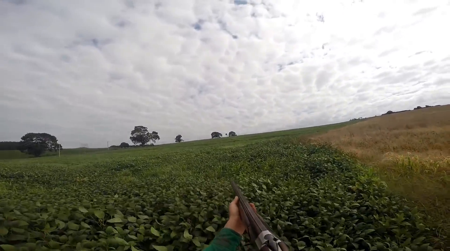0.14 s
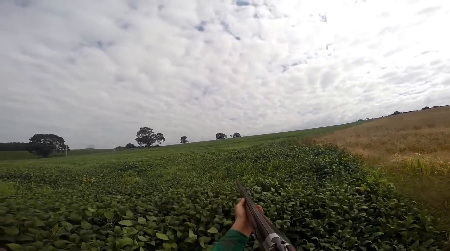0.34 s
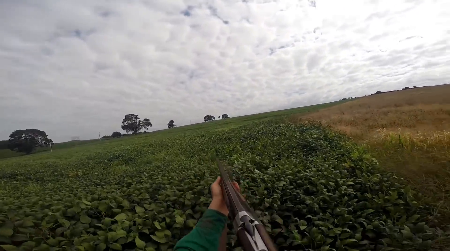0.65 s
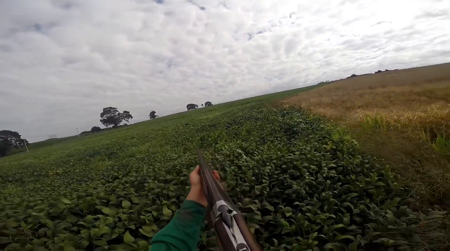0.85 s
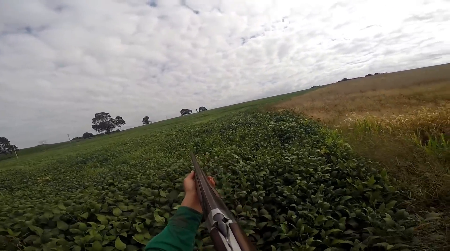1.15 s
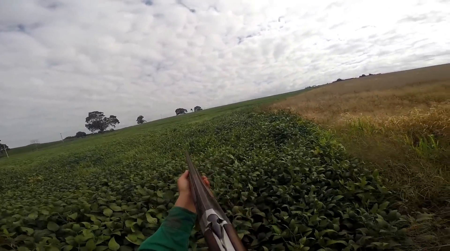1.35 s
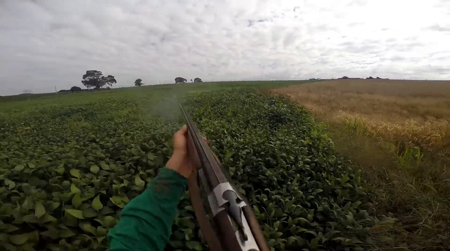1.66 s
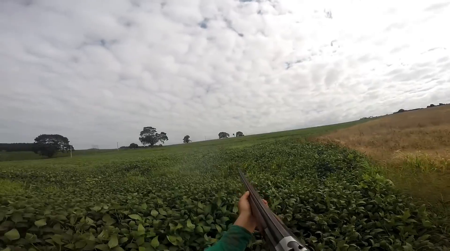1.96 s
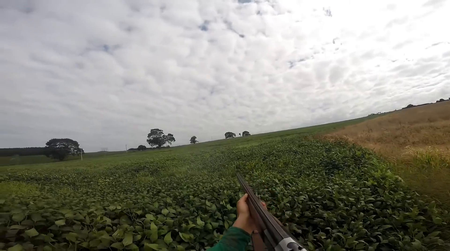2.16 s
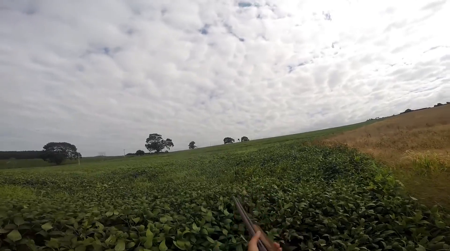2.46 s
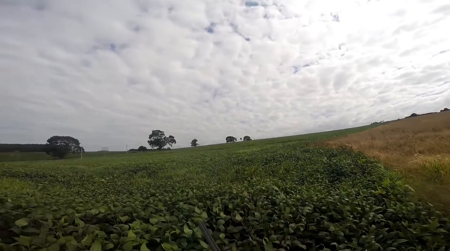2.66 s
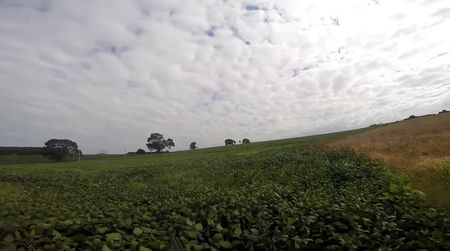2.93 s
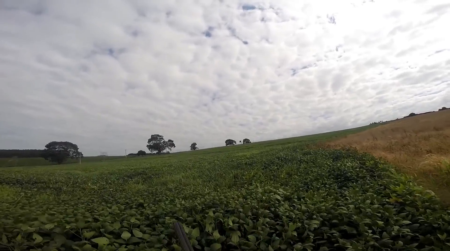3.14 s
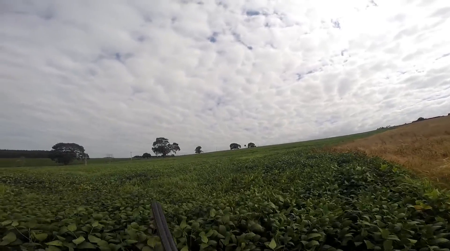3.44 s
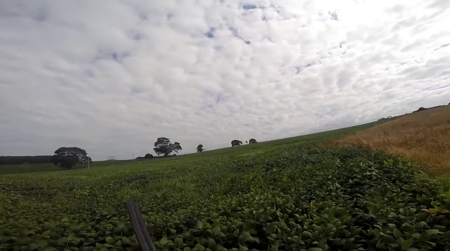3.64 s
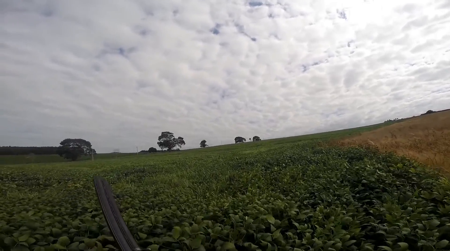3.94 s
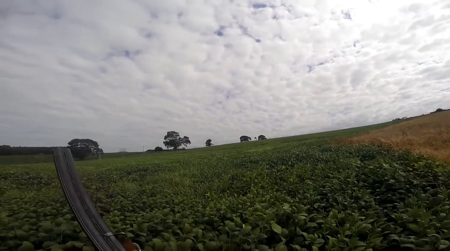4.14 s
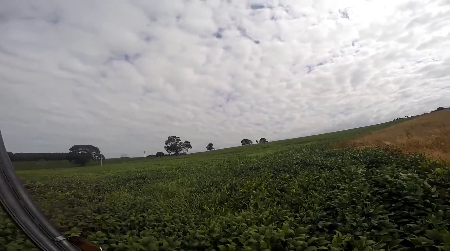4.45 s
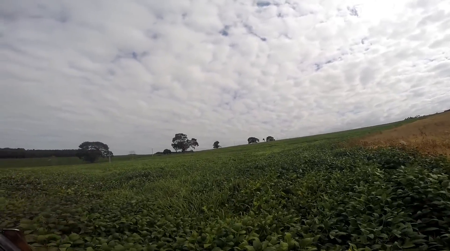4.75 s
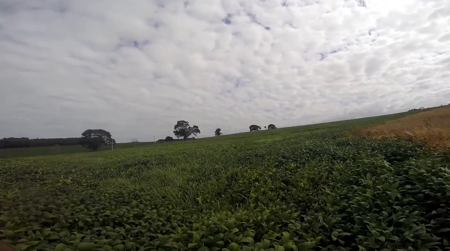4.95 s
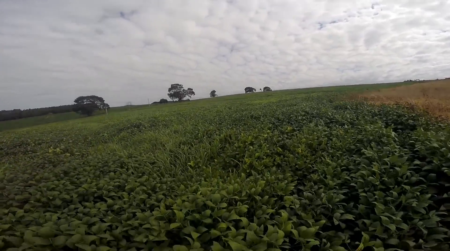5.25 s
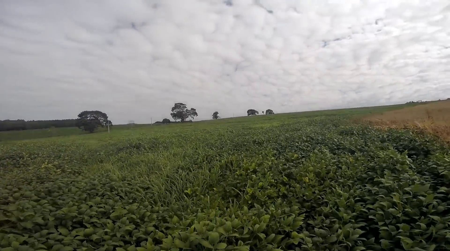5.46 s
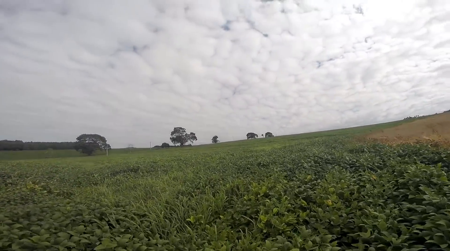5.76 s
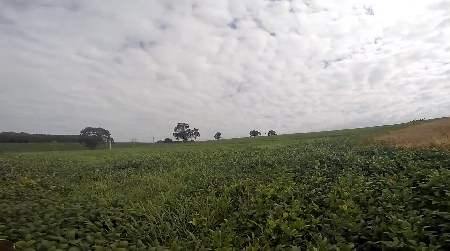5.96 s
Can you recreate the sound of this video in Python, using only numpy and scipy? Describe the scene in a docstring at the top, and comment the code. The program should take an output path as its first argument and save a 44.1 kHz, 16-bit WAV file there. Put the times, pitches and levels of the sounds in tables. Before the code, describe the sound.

Wind dominates from the start: low, uneven pressure lumps and fluttering thumps around 200 to 300 Hz on a small camera's housed microphone, with thin hiss and high whine beneath. A tiny far chirp comes at 0.8 s. Strong puffs and a thin snap at 1.45 s precede one close shotgun shot at 1.63 s: a clipped low push, tight double crack, and a dry, bright report rolling off the field, mostly gone by 2 s. Hiss drops, then slowly recovers. Small metal ticks and stem snaps follow at 2.3-2.8 s. Gusts crowd into raspy flutter with fine snaps around 2.9-3.3 s, then ease. A knocking gear clatter lands at 4.21 s, stems snap near 4.6 s amid hard puffs, and another quick metal clatter comes at 5.25-5.3 s. Soft, crackling leaf swishes from passing legs recur from 4 s to the end, with a heavy wind thump at 5.8 s.

```python
"""A shotgun is fired once over an open crop field: a low overloading push, a double crack, a roll from the field.
Gusty wind thumps on the microphone port of a small camera in its housing: shaped noise and single bell-shaped tones.
Legs swish through leaves (swelling noise and crackle), gun and gear tick (decaying modes), short noise bursts rasp.
A far bird chirps once; the camera's own hiss and whine sink after loud moments, then recover."""
import sys
import numpy as np
from scipy import signal
from scipy.fft import rfft, irfft, next_fast_len
from scipy.io import wavfile
from scipy.ndimage import uniform_filter1d, map_coordinates

SR = 44100
rng = np.random.default_rng(int(sys.argv[2]) if len(sys.argv) > 2 else 0)


def generate_wav(sig):
    """Save sig (samples, or channels by samples) to the path in sys.argv[1] as 16-bit PCM at SR."""
    pcm = np.round(np.clip(np.atleast_2d(sig).T, -1, 1) * 32767).astype(np.int16)
    wavfile.write(sys.argv[1], SR, pcm)


N = 268877

# Noise colours. Each row: frequency in Hz, relative level in dB per Hz.
HISS_COLOUR = [(400, -19), (800, -1), (1400, -3), (4700, -13), (5800, -12.5), (8000, -19), (12000, -22.5),
               (14800, -28), (15600, -31.5)]
# Leaves, heard through the housing, which favours two bands. Columns as above.
LEAF_COLOUR = [(550, -31), (900, -5), (1400, -2.5), (2600, 0.5), (3000, 0), (3400, 1.5), (3900, -5),
               (5200, -10), (5900, -3), (6700, -10), (7900, -21.5), (11000, -19.5), (14300, -50.5)]
# Dull part of the rough bursts. Columns as above.
ROUGH_COLOUR = [(300, -33), (600, 15.5), (1000, 4), (2500, -6), (4000, -29), (9000, -43)]
# Crack of small contacts and snaps. Columns as above.
CONTACT_COLOUR = [(250, -26.5), (600, -2.5), (1200, 4), (2500, 2), (3500, -11.5), (6000, -15), (10000, -27),
                  (15000, -34.5)]
# Slow wind pressure. Columns as above.
RUMBLE_COLOUR = [(12, -28), (22, -1), (60, 4.5), (120, -0.5), (200, -8.5), (330, -34), (600, -90.5)]
# Small wind eddies. Columns as above.
FLUTTER_COLOUR = [(40, -28), (110, 0.5), (200, -1), (290, 4), (340, -3), (400, -9.5), (470, -16),
                  (560, -28), (750, -40.5), (1000, -87)]
# Rasp of strong eddies. Columns as above.
RASP_COLOUR = [(300, -27.5), (500, 17.5), (700, 2), (900, -12.5), (1500, -23), (2500, -35), (5000, -45.5),
               (12000, -63.5)]
# The muzzle crack itself. Columns as above.
MUZZLE_COLOUR = [(400, -24), (700, -5), (1050, 4), (1300, -6), (2100, -5), (3300, -1), (4800, -13),
                 (8400, -21), (15500, -39)]
# The report through the housing. Columns as above.
REPORT_COLOUR = [(470, -45.5), (800, -23.5), (1700, -5.5), (2210, -8.5), (2750, -5), (3050, -7.5),
                 (3400, -1), (3860, -8.5), (5070, -11.5), (5600, -9), (6700, -14.5), (7600, -24),
                 (11500, -29.5), (15500, -43.5)]

# Camera electronics. Each row: frequency in Hz, relative level in dB.
WHINE_LINES = [(5846, 6), (8780, -7.5), (11715, 1.5), (14626, 1)]
# Drops of hiss, whine and the faint rustle of leaves after loud moments.
# Each row: start in seconds, depth in dB.
SINKS = [(1.449, 7), (1.629, 14), (2.299, 7.5), (2.97, 11.5), (3.13, 11), (4.68, 7.5), (5.801, 4.5)]
# A far bird. Each row: centre in seconds, level in dB, pitch in Hz, half length in ms.
BIRD_CHIRPS = [(.81, -56, 1210, 30)]
# Legs push through the leaves. Each row: centre in seconds, level in dB, half length in ms.
SWISHES = [(2.5, -70, 75), (3.97, -65.5, 100), (4.489, -63, 70), (4.615, -62, 40), (4.85, -65, 270),
           (5.43, -59, 100), (5.719, -65.5, 170), (6.07, -59.5, 100)]
# Single stems snap. Each row: centre in seconds, level in dB, ring in Hz.
STEM_SNAPS = [(2.482, -50, 1450), (2.506, -49, 1450), (2.555, -52.5, 3400), (4.548, -49, 2800),
              (4.592, -51, 2700), (4.637, -45, 2930), (4.649, -44, 2580), (4.753, -50, 2750),
              (4.812, -51, 3400)]
# Short rough bursts of noise: brushes, gust rasp and the crunch of knocks. Each row: peak time in seconds,
# level in dB, rise in ms, fall in ms, bright crunch over the dull noise in dB.
ROUGH_BURSTS = [(2.26, -51, 25, 25, -21.5), (3.145, -45.5, 87, 3.3, -13), (3.272, -48.5, 2, 9.6, -16),
                (4.215, -46, 0.7, 23, -6.5), (5.288, -45, 2.8, 24, 2)]
# Gun and gear contacts. Each row: start in seconds, level in dB, ring in Hz, then crack, knock and
# bright modes, each in dB relative to the ring.
CONTACTS = [(1.794, -45, 1500, 5, 6, -25.5), (2.3349, -43, 3440, 0, -19, -15),
            (2.417, -43.5, 2430, -14, -15, -20), (2.602, -44, 2360, -5, -11, -18),
            (2.8175, -36, 2270, -9, -1, -7), (4.214, -33, 2400, -1.5, 11, -12),
            (4.2225, -40, 2420, -6, 21, -19), (4.2294, -42, 2360, -2.5, 17, -17),
            (4.245, -46.5, 2280, 1, 4, -13), (5.245, -43, 2400, -6, -10, -22),
            (5.286, -41.5, 2710, -4, 23, -9), (5.29, -36, 2350, -8, -8, -17),
            (5.297, -34, 2300, -2, -15, -18), (5.303, -34.5, 1860, -10, -17, -16)]
# Upper modes of the steel. Each row: frequency in Hz, relative level in dB, 60 dB decay in seconds.
STEEL_MODES = [(4500, -2.5, 0.013), (5060, -2, 0.0095), (5560, -8, 0.018), (9400, -10, .012)]
# Thin bright snaps in the strongest gusts. Each row: start in seconds, level in dB.
GUST_SNAPS = [(1.4492, -31), (3.1057, -38), (3.118, -36), (3.135, -42)]
# Gusts. Each row: start in seconds, length in seconds, rumble level in dB, flutter level in dB.
GUSTS = [(0.0, 0.48, -22, -34.5), (0.496, 0.21, -16.5, -22), (0.763, 0.14, -18.5, -29.5),
         (0.941, 0.081, -17, -28), (1.032, 0.21, -28, -40.5), (1.215, 0.26, -18.5, -25),
         (1.41, .2, -19.5, -19), (1.645, 0.16, -40, -38), (1.841, 0.033, -45, -26),
         (1.92, 0.23, -35.5, -33), (2.187, 0.0034, -30.5, -20.5), (2.225, 0.24, -22, -18.5),
         (2.527, 0.0042, -35, -21), (2.582, 0.16, -19, -23.5), (2.759, 0.064, -26, -32),
         (2.846, 0.073, -16, -21), (2.958, 0.03, -30, -19), (3.012, 0.087, -37.5, -17.5),
         (3.072, 0.053, -25, -12), (3.16, 0.051, -39, -20), (3.264, 0.035, -32.5, -16.5),
         (3.325, 0.064, -37.5, -21), (3.432, 0.072, -41, -32), (3.572, 0.029, -26.5, -43.5),
         (3.676, 0.13, -24, -23.5), (3.852, 0.063, -35, -36.5), (3.933, 0.033, -17, -26.5),
         (4.022, 0.015, -18, -15), (4.112, 0.16, -22.5, -23), (4.457, 0.031, -18.5, -26),
         (4.522, 0.081, -30.5, -37), (4.637, 0.12, -24.5, -18), (4.805, 0.26, -20.5, -24),
         (5.129, 0.099, -16.5, -29), (5.28, 0.18, -24.5, -28.5), (5.477, 0.085, -30, -35),
         (5.656, 0.21, -19, -22.5), (5.926, 0.032, -20.5, -29.5), (6.014, .1, -22.5, -26.5)]
# Strongest eddies ringing the port. Each row: centre in seconds, level in dB, pitch in Hz, rasp in dB.
PUFFS = [(0.069, -10, 208, -57), (0.361, -16, 257, -47), (0.501, -11.5, 186, -56), (0.54, -9.5, 217, -43),
         (0.577, -9.5, 160, -61), (0.598, -4.5, 199, -42.5), (0.642, -12, 168, -46),
         (0.957, -9.5, 226, -38.5), (0.984, -9, 214, -47), (1.368, -7.5, 190, -50), (1.451, -4, 294, -19.5),
         (1.513, -3, 230, -29.5), (1.584, -4.5, 236, -40), (1.879, -10.5, 225, -40), (1.899, -18, 270, -55),
         (1.965, -16.5, 266, -48), (2.062, -22.5, 299, -51.5), (2.195, -5.5, 258, -36),
         (2.229, -7.5, 338, -37), (2.247, -5.5, 276, -35), (2.272, -2, 266, -34), (2.319, -9, 111, -58),
         (2.374, -8.5, 216.6, -58), (2.404, -8, 172, -55.5), (2.441, -6.5, 269, -52.5),
         (2.574, -8.5, 235, -62), (2.595, -6, 218, -56), (2.662, -6, 236, -39), (2.888, -8.5, 191, -52.5),
         (2.918, -2.5, 304, -51.5), (2.963, -2, 296, -29), (2.984, -9.5, 298, -24), (2.991, -1, 306, -27),
         (2.997, -13, 318, -23.5), (3.045, -11, 307, -27.5), (3.062, -8.5, 307, -23.5),
         (3.083, -5.5, 250, -30), (3.093, -7, 286, -30), (3.108, -3.5, 267, -29), (3.124, -5.5, 322, -33),
         (3.146, -14, 314, -27), (3.174, -14, 314, -32), (3.268, -14, 208, -47), (3.289, -12, 315, -40),
         (3.384, -14, 284, -44), (3.681, -16.5, 186, -54.5), (3.745, -9.5, 240, -54),
         (4.031, -8.5, 230, -38.5), (4.046, -1.5, 245, -26), (4.117, -12, 241, -58.5),
         (4.166, -13.5, 312, -37), (4.275, -11, 300, -56), (4.465, -14.5, 205, -50),
         (4.644, -3.5, 210, -34), (4.672, 0, 253.5, -35), (4.699, -9, 276, -62), (4.722, -4, 282, -47),
         (4.742, -4, 228, -37), (4.837, -10, 235, -53), (4.867, -11, 252, -46), (4.907, -9.5, 219, -55),
         (5.027, -11, 270, -47), (5.145, -7, 245, -45.5), (5.185, -8.5, 207, -37.5),
         (5.236, -14.5, 275, -49), (5.664, -6, 255, -47.5), (5.739, -14, 120, -62),
         (5.774, -10.5, 234, -54), (5.803, -1.5, 206.5, -31), (5.832, -6, 213, -52),
         (5.926, -10, 235, -49.5), (6.056, -10, 179, -52), (6.074, -10, 190, -53)]
# Low push of the shot and its ground bounce. Each row: delay in seconds, level in dB, pitch in Hz,
# half length in ms.
SHOT_PUSHES = [(0, 6.5, 283.5, 1.5), (.0072, -6, 246.6, 1.6)]
# The report rolls back from the field. Each row: time in seconds, level in dB, tilt in dB per octave.
FIELD_ROLL = [(1.639, -32, 2.5), (1.654, -39.5, 0.5), (1.718, -43.5, 2.5), (1.749, -49.5, -5),
              (1.78, -47, -1), (1.815, -45, -1.5), (1.869, -53.5, -3), (1.92, -56.5, -4), (1.98, -61.5, -5),
              (2.121, -72, -1.5)]
# Single echoes. Each row: centre in seconds, level in dB, half length in ms, tilt in dB per octave.
ECHOES = [(1.679, -40.5, 2, 2), (1.684, -40, 1.8, 4), (1.706, -41, 0.91, 6.5)]

WHINE_DB, HISS_DB, BREEZE_DB = -77.5, -60.5, -68.5  # before any sinking
RECOVER_DB_PER_S, SINK_S = 8, 0.03
CRACKLES_PER_S, CRACKLE_DB = 64, -8  # level relative to the rustle
STEM_HALF_MS = 1.3
RING_T60_S, CRACK_T60_S = 0.018, 0.012
KNOCK_HZ, KNOCK_T60_S = 780, 0.007
LULL_RUMBLE_DB, LULL_FLUTTER_DB = -42, -43  # between gusts
GUST_RISE_MS, GUST_FALL_MS = 3.9, 12.9
RUMBLE_SLOWER = 1.5  # factor on rise and fall
PUFF_HALF_MS_AT_250_HZ, PUFF_PITCH_POWER, RASP_LONGER = 2.3, 0.65, 1.44
PUSH_PER_OCTAVE, PUSHLESS_HZ = 0.86, 266  # lower puffs ride on a larger one-sided push
PHASE_SPREAD_CYCLES = 0.22  # scatter about suction at the puff's centre
FLUTTER_DISPLACED = 0.35  # share of the flutter that a puff replaces
SHOT_S = 1.632
TOP_HZ = 15650


def amp(db):
    """dB to amplitude."""
    return 10 ** (np.asarray(db) / 20)


def unit(x):
    """x scaled to rms 1."""
    return x / np.sqrt(np.mean(x ** 2) + 1e-20)


def bell(t, half_ms):
    """Gaussian envelope with half_ms as its standard deviation."""
    return np.exp(-0.5 * (t / (half_ms / 1000)) ** 2)


def along(points, hz):
    """(Hz, value) points interpolated on a log axis."""
    f, v = np.transpose(points)
    return np.interp(np.log(hz + 1), np.log(f + 1), v)


def wobble(rate):
    """Smooth random curve, rate knots a second."""
    knots = rng.standard_normal(int(N * rate / SR) + 4)
    return map_coordinates(knots, [np.arange(N) * rate / SR])


def filtered(x, response):
    """x times a response of frequency."""
    m = next_fast_len(len(x) + 8192)
    return irfft(rfft(x, m) * response(np.fft.rfftfreq(m, 1 / SR)), m)[:len(x)]


def coloured(x, spectrum):
    """x given a (Hz, dB) colour, rms 1."""
    return unit(filtered(x, lambda hz: amp(along(spectrum, hz))))


def lumpy(rate, depth_db):
    """White noise whose level wanders at rate knots a second."""
    return amp(depth_db * wobble(rate)) * rng.standard_normal(N)


def evened(x, span_s):
    """x with its level held steady over span_s; faster lumps stay."""
    span = round(span_s * SR)
    power = uniform_filter1d(uniform_filter1d(x ** 2, span), span)
    return x / np.sqrt(np.abs(power) + 0.0016)


def wavelets(rows, push):
    """Bell-shaped tone for each (s, dB, Hz, half ms) row, riding on a one-sided push of that share."""
    out, t = np.zeros(N + SR), np.arange(-SR // 10, SR // 10) / SR
    turns = 0.5 + PHASE_SPREAD_CYCLES * rng.standard_normal(len(rows))
    for (s, db, hz, half_ms), share, turn in zip(rows, push, turns):
        tone = np.cos(2 * np.pi * (hz * t + turn)) + share * np.cos(2 * np.pi * turn)
        out[round(s * SR):][:len(t)] += amp(db) * bell(t, half_ms) * tone
    return out[SR // 10:][:N]


def sinking():
    """Gain of hiss, whine and faint rustle: a quick drop at each loud moment, then a steady climb in dB."""
    t = np.arange(N) / SR
    drops_db = [np.where(t > s, db - RECOVER_DB_PER_S * (t - s), 0) for s, db in SINKS]
    depth_db = np.maximum(np.max(drops_db, axis=0), 0)
    return amp(-uniform_filter1d(depth_db, round(SINK_S * SR)))


def camera_noise(sunk):
    """Coloured hiss and steady sine lines, both under the sinking gain."""
    t = np.arange(N) / SR
    whine = np.zeros(N)
    for hz, db in WHINE_LINES:
        drift = 0.035 * np.cumsum(rng.standard_normal(N))  # phase noise widens the line
        whine += amp(WHINE_DB + db) * np.sin(2 * np.pi * hz * t + drift)
    hiss = amp(HISS_DB) * coloured(rng.standard_normal(N), HISS_COLOUR)
    return sunk * (hiss + whine)


def far_bird():
    """Short bell-shaped tone without push."""
    return wavelets(BIRD_CHIRPS, push=np.zeros(len(BIRD_CHIRPS)))


def crackle():
    """Leaves and stems snap: sparse short rings of scattered size and pitch, coloured like the leaves."""
    when, size, pitch = rng.random((round(CRACKLES_PER_S * N / SR), 3)).T
    t = np.arange(-150, 150) / SR
    tones = np.cos(2 * np.pi * 1300 * 5 ** pitch[:, None] * t)
    rings = amp(-4 * np.log(size + 0.13))[:, None] * bell(t, 0.8) * tones
    spots = (when * (N - len(t))).astype(int)[:, None] + np.arange(len(t))
    return coloured(np.bincount(spots.ravel(), rings.ravel(), N), LEAF_COLOUR)


def leaves(sunk):
    """Coloured noise and crackle swell with each swish over a faint breeze; single stems ring briefly."""
    t = np.arange(N) / SR
    swishes = sum(amp(db) * bell(t - s, half_ms) for s, db, half_ms in SWISHES)
    stir = (amp(BREEZE_DB) * sunk + swishes) * amp(1.1 * wobble(30))
    rustle = coloured(lumpy(rate=990, depth_db=1.0), LEAF_COLOUR)
    stems = wavelets([(*row, STEM_HALF_MS) for row in STEM_SNAPS], push=np.zeros(len(STEM_SNAPS)))
    return stir * (rustle + amp(CRACKLE_DB) * crackle()) + stems


def rough_bursts():
    """Brushes, gust rasp and crunch of knocks: grainy dull noise and a brighter crunch under one swell each."""
    t = np.arange(N) / SR
    dull = coloured(lumpy(rate=180, depth_db=4.0), ROUGH_COLOUR)
    crunch = coloured(lumpy(rate=300, depth_db=8.0), LEAF_COLOUR)
    out = np.zeros(N)
    for s, db, rise_ms, fall_ms, crunch_db in ROUGH_BURSTS:
        swell = bell(t - s, np.where(t < s, rise_ms, fall_ms))
        out += amp(db) * swell * (dull + amp(crunch_db) * crunch)
    return out


def decaying_mode(t, hz, db, t60_s):
    """Sine falling 60 dB in t60_s."""
    return amp(db - 60 * t / t60_s) * np.sin(2 * np.pi * hz * t)


def gear_ticks():
    """Each small contact rings the steel in decaying modes, cracks and knocks the housing."""
    out, t = np.zeros(N + SR), np.arange(SR // 10) / SR
    onset = 1 - np.exp(-t / 0.00034)
    for s, db, hz, crack_db, knock_db, bright_db in CONTACTS:
        ring = decaying_mode(t, hz, 0, RING_T60_S)
        knock = decaying_mode(t, KNOCK_HZ, knock_db, KNOCK_T60_S)
        bright = sum(decaying_mode(t, f, level + bright_db + rng.normal(0, 2), t60_s)
                     for f, level, t60_s in STEEL_MODES)
        noise = coloured(rng.standard_normal(len(t)), CONTACT_COLOUR)
        crack = amp(crack_db - 60 * t / CRACK_T60_S) * noise
        out[round(s * SR):][:len(t)] += amp(db) * (ring - knock + bright + crack) * onset
    return out[:N]


def gust_snaps():
    """Each snap is a very short burst of crack noise."""
    out, t = np.zeros(N + SR), np.arange(SR // 10) / SR
    for s, db in GUST_SNAPS:
        noise = coloured(rng.standard_normal(len(t)), CONTACT_COLOUR)
        out[round(s * SR):][:len(t)] += amp(db) * bell(t - 0.001, 0.18) * noise
    return out[:N]


def gusts():
    """Rumble and flutter level in dB: each gust rises, holds and falls back to the lull."""
    t, slower = np.arange(N) / SR, np.array([[RUMBLE_SLOWER], [1]])
    power = amp([[2 * LULL_RUMBLE_DB], [2 * LULL_FLUTTER_DB]]) * np.ones(N)
    for s, length_s, *levels_db in GUSTS:
        near = slice(max(round((s - 0.2) * SR), 0), round((s + length_s + 0.4) * SR))
        before, after = np.minimum(t[near] - s, 0), np.maximum(t[near] - s - length_s, 0)
        shape = bell(before, GUST_RISE_MS * slower) * bell(after, GUST_FALL_MS * slower)
        power[:, near] += (amp(levels_db)[:, None] * shape) ** 2
    return 10 * np.log10(power)


def puff_ms(hz):
    """Half length of a puff: higher ones, nearer the port's resonance, ring longer."""
    return PUFF_HALF_MS_AT_250_HZ * (hz / 250) ** PUFF_PITCH_POWER


def puffs():
    """Strong eddies ring the port, the lower ones with a one-sided pressure push."""
    rows = [(s, db, hz, puff_ms(hz)) for s, db, hz, _ in PUFFS]
    push = [PUSH_PER_OCTAVE * max(np.log2(PUSHLESS_HZ / hz), 0) for _, _, hz, _ in PUFFS]
    return wavelets(rows, push)


def wind():
    """Slow pressure lumps, a lumpy flutter of small eddies and single strong puffs with a rasp."""
    t = np.arange(N) / SR
    rumble_db, flutter_db = gusts() + 0.91 * wobble(22)  # quick level changes shared by both layers
    rumble = amp(rumble_db) * evened(coloured(lumpy(rate=14, depth_db=7.5), RUMBLE_COLOUR), span_s=0.061)
    flutter = amp(flutter_db) * evened(coloured(lumpy(rate=46, depth_db=6.0), FLUTTER_COLOUR), span_s=0.046)
    rasp_level = amp(2.8 * flutter_db - 10.5)  # grows faster than the flutter itself
    for s, _, hz, rasp_db in PUFFS:
        near = slice(max(round((s - 0.05) * SR), 0), round((s + 0.05) * SR))
        shape = bell(t[near] - s, RASP_LONGER * puff_ms(hz))
        rasp_level[near] += amp(rasp_db) * shape
        flutter[near] *= 1 - FLUTTER_DISPLACED * shape
    rasp = rasp_level * coloured(lumpy(rate=180, depth_db=1.3), RASP_COLOUR)
    return rumble + flutter + puffs() + rasp


def field_return():
    """The report rolls back: noise shaped frame by frame in level and spectral tilt, with single echoes."""
    report = coloured(lumpy(rate=72, depth_db=1.5), REPORT_COLOUR)
    hz, frame_s, z = signal.stft(report, SR, nperseg=128)
    octaves = np.clip(np.log2((hz[:, None] + 300) / 3000), -3, 1.5)
    when_s, roll_db, roll_tilt = np.transpose(FIELD_ROLL)
    level_db = np.interp(frame_s, when_s, roll_db, -120, -120)
    roll = amp(level_db + np.interp(frame_s, when_s, roll_tilt) * octaves)
    echoes = sum(amp(db + tilt * octaves) * bell(frame_s - s, half_ms) for s, db, half_ms, tilt in ECHOES)
    return signal.istft(z * (roll + echoes), SR, nperseg=128)[1][:N]


def shot():
    """Low overloading push with its ground bounce, a double crack, then the return from the field."""
    t = np.arange(N) / SR - SHOT_S
    push = sum(amp(db) * bell(t - lag_s, half_ms) * np.cos(2 * np.pi * hz * (t - lag_s))
               for lag_s, db, hz, half_ms in SHOT_PUSHES)
    double = bell(t + 0.001, 0.7) + 0.8 * bell(t - 0.0006, 0.4)
    crack = amp(1.0) * double * coloured(rng.standard_normal(N), MUZZLE_COLOUR)
    report = amp(-17.5) * bell(t, 3.7) * coloured(rng.standard_normal(N), REPORT_COLOUR)
    return push + crack + report + field_return()


def scene():
    """Sum of all sources, one channel."""
    sunk = sinking()
    background = camera_noise(sunk) + far_bird() + leaves(sunk)
    contacts = rough_bursts() + gear_ticks() + gust_snaps()
    return (background + contacts + wind() + shot())[None]


def record(dry):
    """The input stage clips at full scale; nothing passes above the band limit."""
    clipped = dry[0] / (1 + np.abs(dry[0]) ** 24) ** (1 / 24)
    return filtered(clipped, lambda hz: hz < TOP_HZ)[None]


dry = scene()
out = record(dry)
generate_wav(out)
```